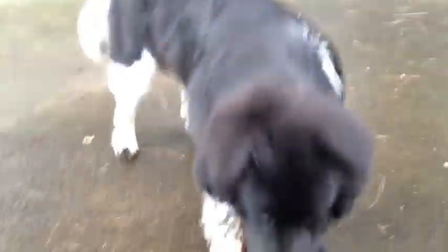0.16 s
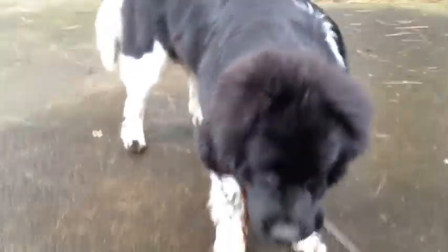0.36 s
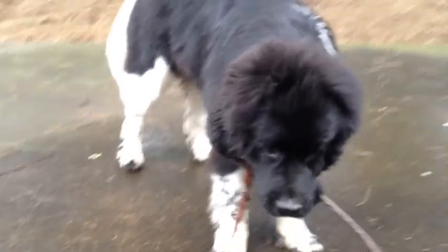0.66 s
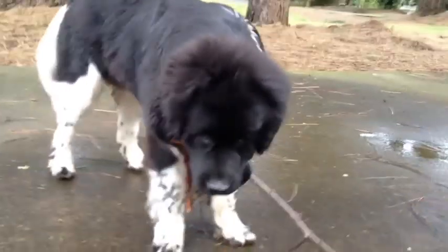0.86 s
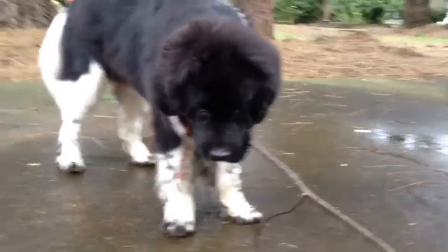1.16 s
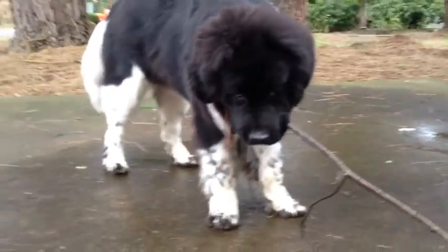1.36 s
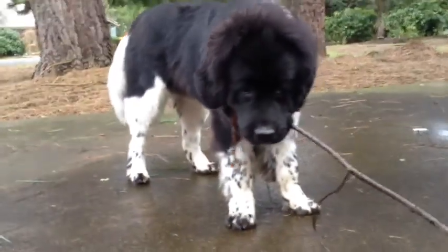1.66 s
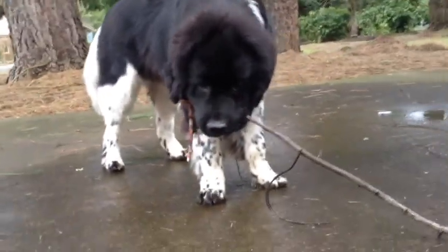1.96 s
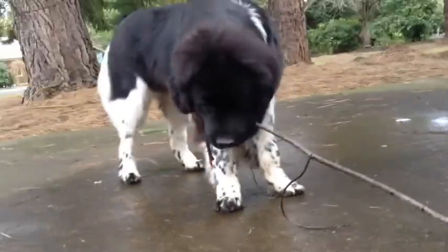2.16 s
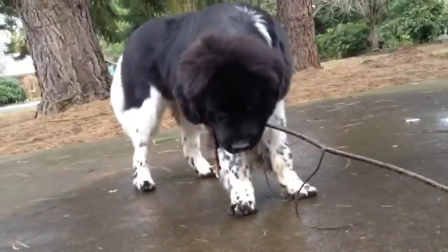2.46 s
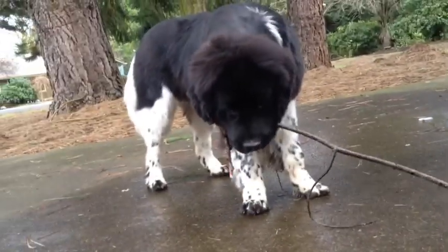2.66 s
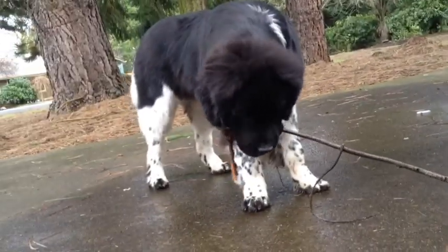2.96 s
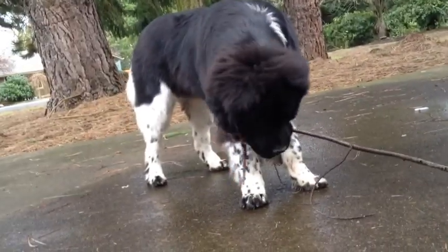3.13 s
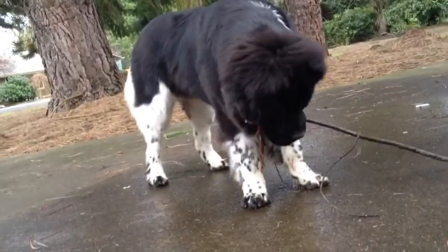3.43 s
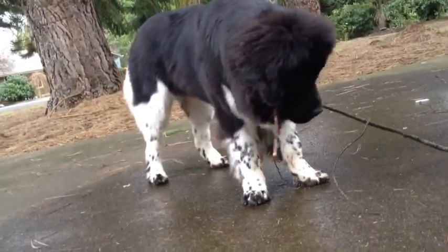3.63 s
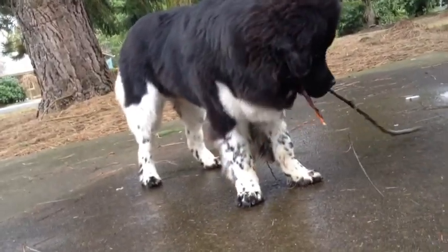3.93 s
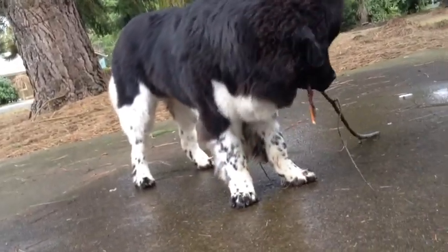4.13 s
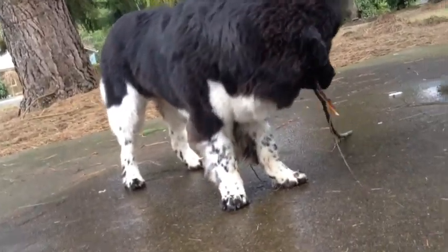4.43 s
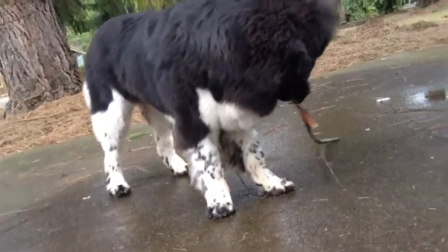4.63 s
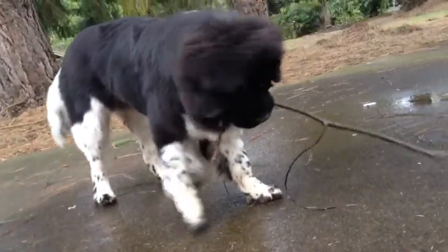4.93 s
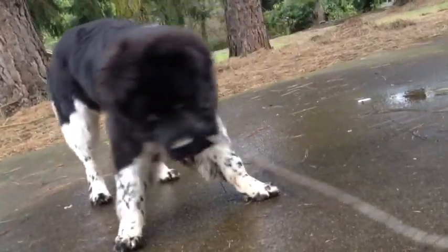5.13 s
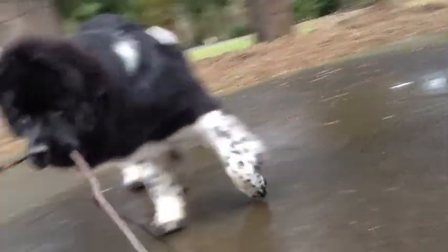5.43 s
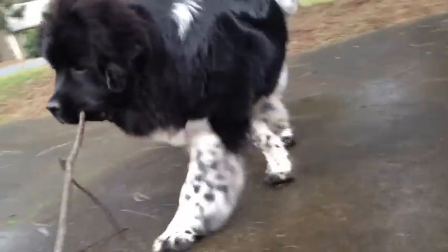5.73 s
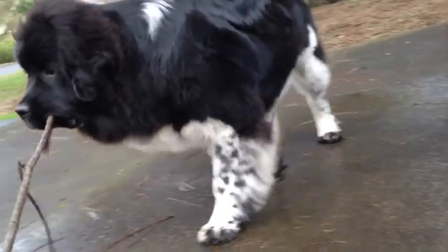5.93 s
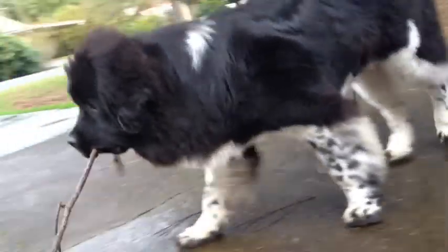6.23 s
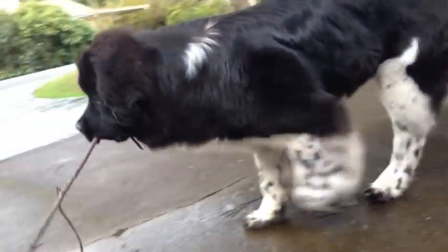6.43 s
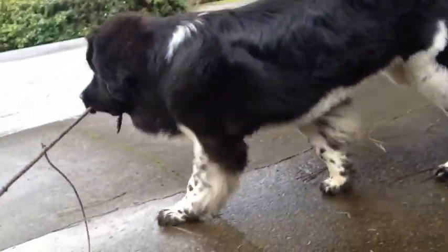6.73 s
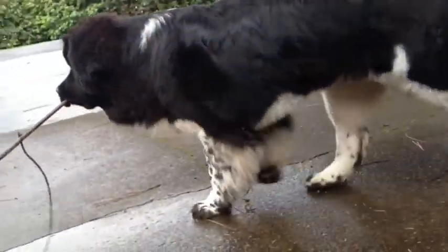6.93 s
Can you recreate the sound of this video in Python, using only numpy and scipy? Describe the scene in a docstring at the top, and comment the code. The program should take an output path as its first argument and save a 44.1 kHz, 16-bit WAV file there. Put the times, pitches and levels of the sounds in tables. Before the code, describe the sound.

One loud snap of a branch, a clattering cluster of knocks and scrapes, then light claw taps over soft traffic rumble and thin birdsong.

```python
"""A long branch, carried over wet garden pavement by a puppy, cracks once, then knocks, clacks and scrapes.
Impulsive or gritty forces drive damped resonances of the wood; claws and twig tips tick as short snaps and rings.
Wet paws scuff and soft rustles swell as shaped friction noise; a near echo and scattering leaves surround them.
A small bird whistles rows of sagging tones among trees; far traffic is filtered noise, with one car slowly
passing and one engine droning as a narrow resonance, over a steady faint hiss."""
import sys
import numpy as np
from scipy import signal
from scipy.fft import rfft, irfft
from scipy.io import wavfile
from scipy.ndimage import uniform_filter1d

SR = 44100
rng = np.random.default_rng(int(sys.argv[2]) if len(sys.argv) > 2 else 0)


def transcribe(u):
    """Save the signal u as a 16-bit wav file named by the first command-line argument.

    u: samples, shape (n,) or (channels, n), limited to [-1, 1]; the rate is SR.
    q: integer samples, one column per channel.
    """
    v = np.clip(np.atleast_2d(u).T, -1, 1)
    q = np.round(v * 32767).astype(np.int16)
    wavfile.write(sys.argv[1], SR, q)


N = 312404
TIME = np.arange(N) / SR


def from_db(db):
    """Level to amplitude: 20 dB is a factor of ten."""
    return 10 ** (np.asarray(db) / 20)


def rms_one(x):
    """Normalisation to unit root-mean-square amplitude."""
    return x / np.sqrt(np.mean(x ** 2) + 1e-20)


def at_level(hit, db):
    """Short-time level: the loudest 2 ms of a hit get the given rms level."""
    loudest_power = uniform_filter1d(hit ** 2, SR // 500).max()
    return from_db(db) * hit / np.sqrt(loudest_power)


def add(track, s, sound):
    """Superposition: mix a sound into the track at time s."""
    start = max(round(s * SR), 0)
    track[start:start + len(sound)] += sound[:max(N - start, 0)]


def cut(x, hz, kind, order=2):
    """Band limiting by a Butterworth low- or high-pass."""
    sos = signal.butter(order, np.clip(hz, 20, .45 * SR), kind, fs=SR, output="sos")
    return signal.sosfilt(sos, x)


def resonance(x, hz, width_hz):
    """Damped mode of vibration: a two-pole resonator with gain 1 at its peak."""
    r = np.exp(-np.pi * width_hz / SR)
    feedforward = np.array([1, 0, -1]) * (1 - r * r) / 2
    feedback = [1, -2 * r * np.cos(2 * np.pi * hz / SR), r * r]
    return signal.lfilter(feedforward, feedback, x + 1e-18)


def dying(t, t60):
    """Exponential decay: an envelope that falls by 60 dB in t60."""
    return np.exp(-np.log(1000) * t / t60)


def drift(per_s):
    """Random modulation, rms 1: straight lines between 4000 random knots, then the last value held."""
    knots = rng.standard_normal(4000)
    return rms_one(np.interp(TIME * per_s, np.arange(len(knots)), knots))


def coloured_noise(spectrum):
    """Spectral shaping: steady noise of a given spectrum, falling 20 dB per octave beyond its ends; rms 1."""
    hz, db = np.transpose(spectrum)
    octave, known = np.log2(np.arange(N // 2 + 1) * SR / N + 1), np.log2(hz)
    beyond = np.abs(octave - np.clip(octave, known[0], known[-1]))
    gain = from_db(np.interp(octave, known, db) - 20 * beyond)
    return rms_one(irfft(rfft(rng.standard_normal(N)) * gain, N))


def contact(t60, grit):
    """Impact excitation: one push, then a dying chatter of tiny slips."""
    t = np.arange(SR // 5) / SR
    force = grit * rng.standard_normal(len(t)) * dying(t, t60)
    force[0] += 1
    return force


# Modes of the branch. Each row: frequency in Hz, width in Hz, gain in dB.
BRANCH_MODES = [(242, 128, -11), (585, 150, -13), (896, 70, 6.5), (1318, 151, -5.5), (2000, 173, -5.5),
                (2660, 127, -5), (4260, 370, -13), (4500, 200, -8.5), (5440, 200, -7.5), (5900, 177, -12),
                (7190, 290, -5), (7820, 540, -7.5), (8460, 360, -5), (9680, 350, -6.5), (11030, 400, -7),
                (11420, 383, -7), (13320, 235, -9.5), (14780, 180, -14)]


def branch(force, drive):
    """Modal superposition: each mode of the wood answers the force in proportion to its drive."""
    rings = 0
    for share, (hz, width_hz, db) in zip(drive, BRANCH_MODES):
        rings = rings + share * from_db(db) * resonance(force, hz, width_hz)
    return rings


# Fractures within the one sharp crack. Each row: time in seconds, relative level in dB.
FRACTURES = [(0.1743, -5), (0.17585, 0)]


def crack(level_db=-15.5, splinter_db=-23, splinter_t60=0.026, grit=0.04):
    """Brittle fracture: fibres give way within two milliseconds, ring the branch and fizz as splinters."""
    force, t = np.zeros(N), TIME[:SR // 20]
    for s, db in FRACTURES:
        splinters = grit * rng.standard_normal(len(t)) * dying(t, splinter_t60)
        fracture = cut(splinters, hz=3490, kind="high")
        fracture[0] += 1
        add(force, s, from_db(db) * fracture)
    signs = (-1.0) ** np.arange(len(BRANCH_MODES))  # neighbouring modes start in opposite phase
    rings = cut(branch(force, signs), hz=218, kind="high")
    fizz = from_db(splinter_db) * cut(force, hz=2500, kind="high")
    return at_level(rings + fizz, level_db)


# Dull knocks on the branch. Each row: start in seconds, level in dB, highest Hz that the blow excites,
# t60 of the contact chatter in seconds.
BLOWS = [(0.599, -46.5, 680, 0.081), (0.716, -50, 700, 0.05), (1.003, -48.5, 557, 0.05),
         (1.2446, -38.5, 480, 0.06), (1.2523, -42, 620, 0.066), (1.2755, -42.5, 850, 0.093),
         (1.396, -48, 890, 0.02), (1.5432, -38, 720, 0.046), (1.5567, -39, 640, 0.046),
         (1.6873, -29, 302, 0.033), (1.6896, -29, 720, 0.049), (1.763, -48, 890, 0.052),
         (2.217, -47.5, 650, 0.11)]


def knocks(position=0.354, level_db=0.0):
    """Mode-shape excitation: soft blows part-way along the branch ring the low modes without a node there."""
    out = np.zeros(N)
    drive = np.sin(np.pi * np.arange(1, len(BRANCH_MODES) + 1) * position)
    for s, db, top_hz, t60 in BLOWS:
        soft = cut(contact(t60, grit=0.097), top_hz, "low", order=4)
        force = cut(soft, hz=156, kind="high", order=3)
        add(out, s, at_level(branch(force, drive), db + level_db))
    return out


# Hollow wooden clacks. Each row: start in seconds, level in dB, pitch in Hz.
HARD_CONTACTS = [(0.7867, -48.5, 1750), (1.3078, -46, 2100), (1.3155, -52, 1900), (1.4492, -50.5, 1720),
                 (1.5435, -48, 2800), (1.557, -40, 2610), (1.6078, -39, 2450), (1.609, -40, 2450),
                 (1.6255, -30, 2400), (1.6888, -52, 2600), (1.695, -38, 3200), (1.7008, -38, 1590),
                 (1.704, -39, 3280), (1.7165, -46, 2600), (1.725, -42, 1650), (1.764, -47, 2990),
                 (2.2097, -54, 2100), (2.358, -53, 1900)]


def clacks(width_hz=520, top_hz=4200, level_db=0.0):
    """Heavily damped resonance: hard, clean contacts ring for a few cycles."""
    out = np.zeros(N)
    for s, db, hz in HARD_CONTACTS:
        ring = resonance(contact(t60=0.017, grit=0.051), hz, width_hz)
        clack = cut(cut(ring, top_hz, "low"), hz=1300, kind="high", order=3)
        add(out, s, at_level(clack, db + level_db))
    return out


# High resonances heard in every sharp contact. Each row: frequency in Hz, width in Hz, gain in dB.
SHARP_RESONANCES = [(4600, 190, 2), (7100, 1000, -2.5), (12460, 2300, 1.5)]


def sharpened(force):
    """Parallel resonance: sharp contacts are heard directly and through shared high resonances."""
    rings = sum(from_db(db) * resonance(force, hz, width_hz) for hz, width_hz, db in SHARP_RESONANCES)
    return cut(force + rings, hz=14000, kind="low")


# a stroke bites quickly and lets go more slowly: shares of its length
STROKE_ATTACK, STROKE_RELEASE = 0.13, 0.6
# average grain rate under a stroke, and the smooth friction relative to a unit grain
GRAINS_PER_S, FRICTION_DB = 2200, -23


def scuff(length, low_hz, high_hz, grain_db):
    """Granular friction: random grit impulses over smooth noise, under one stroke's pressure; rms 1."""
    size = round(length * SR)
    along = np.linspace(0, 1, size)
    ramps = np.minimum(along / STROKE_ATTACK, (1 - along) / STROKE_RELEASE)
    pressure = np.minimum(1, ramps) ** 0.31
    sizes = from_db(grain_db * np.minimum(rng.exponential(1, size), 3)) * rng.choice([-1, 1], size)
    grains = sizes * (rng.random(size) < GRAINS_PER_S / SR)
    friction = from_db(FRICTION_DB) * rng.standard_normal(size)
    stroke = cut(sharpened(grains + friction) * pressure, low_hz, "high")
    softened = cut(stroke, high_hz, "low", order=1)
    return rms_one(cut(softened, 2 * high_hz, "low", order=1))


# a brighter scrape has less bass: its low edge doubles with each step of brightness
SCRAPE_BASS_HZ, BRIGHTNESS_STEP_HZ = 355, 4050
# Gritty scrapes of the branch. Each row: start in seconds, length in seconds, level in dB before the
# overall trim and clumping, brightness in Hz.
DRAGS = [(0.654, 0.11, -68.5, 8000), (0.777, 0.032, -59.5, 4300), (0.981, 0.037, -66.5, 3000),
         (1.25, 0.06, -52, 695), (1.241, 0.07, -58.5, 4200), (1.297, 0.072, -60.5, 6500),
         (1.436, 0.025, -61.5, 6000), (1.495, 0.2, -62, 6500), (1.541, 0.026, -51, 1510),
         (1.6885, 0.021, -41.5, 4020), (1.711, 0.018, -52.5, 3600), (1.735, 0.069, -65, 6000),
         (2.181, 0.092, -65.5, 5800), (2.259, .04, -62, 7000), (2.33, 0.054, -64, 8000),
         (2.385, 0.06, -64.5, 8000)]


def scrapes(clump_db=2.0, level_db=0.5):
    """Stick-slip friction: the branch drags and catches, so its grit comes in clumps."""
    out = np.zeros(N)
    for s, length, db, bright_hz in DRAGS:
        low_hz = SCRAPE_BASS_HZ * 2 ** (bright_hz / BRIGHTNESS_STEP_HZ)
        add(out, s, from_db(db + level_db) * scuff(length, low_hz, bright_hz, grain_db=4.0))
    return out * from_db(clump_db * drift(300))


def tick(hz, width_hz, snap_db, ring_grit=0.075):
    """Impulse response: a tiny bright snap and a short ring, different at each touch."""
    ring = resonance(contact(t60=0.027, grit=ring_grit), hz, width_hz)
    snap = sharpened(cut(contact(t60=0.023, grit=0.39), hz=2200, kind="high", order=1))
    return at_level(ring, 0) + at_level(snap, snap_db)


# grains catch and let go at random: rate, mean level over the drag's table level, spread
CATCHES_PER_S, CATCH_DB, CATCH_SPREAD_DB = 32, 2, 5


def catches(low_hz=3500, high_hz=9000, width_hz=700, snap_db=-6):
    """Random slip events: small ticks scattered along each longer drag, following its level."""
    out = np.zeros(N)
    for start, length, db, _ in DRAGS:
        for when, pitch in rng.random((int(CATCHES_PER_S * length), 2)):
            catch = tick(low_hz * (high_hz / low_hz) ** pitch, width_hz, snap_db)
            catch_db = db + CATCH_DB + CATCH_SPREAD_DB * rng.standard_normal()
            add(out, start + when * length, at_level(catch, catch_db))
    return out


# a tip skips once after each touch: typical delay in seconds, weakening in dB
SKIP_S, SKIP_LOSS_DB = 0.013, 10
# Touches of claws and twig tips on the ground. Each row: start in seconds, level in dB, ring in Hz,
# ring width in Hz, snap relative to the ring in dB.
TOUCHES = [(0.4345, -55, 13000, 1800, -10), (0.445, -54, 11800, 1400, -10), (0.4505, -53, 6800, 1500, -10),
           (0.459, -52, 5400, 1500, -8), (0.6925, -59, 7400, 900, -4), (0.787, -51, 8950, 2000, -8),
           (0.7925, -47, 8000, 2000, -17), (1.248, -53, 4800, 1180, -1), (1.276, -51, 4600, 1200, -5),
           (1.2988, -57, 6200, 1400, -4), (1.3077, -47, 3900, 500, -11), (1.316, -50, 6000, 1400, -3),
           (1.3212, -52, 7800, 1200, -3), (1.3265, -49, 6800, 1200, 0), (1.333, -52, 7000, 1200, -4),
           (1.3388, -53, 6800, 1500, -4), (1.3925, -57, 9000, 1500, -3), (1.398, -51, 12000, 1500, -1),
           (1.4487, -45, 7160, 900, 3), (1.4665, -51, 13000, 1500, 6), (1.5107, -51, 12300, 1400, -7),
           (1.56, -46, 5600, 1200, -8), (1.6266, -41.5, 7640, 1000, -9), (1.6955, -32, 6940, 900, -4),
           (1.6987, -37, 4500, 500, -8), (1.7042, -42, 7500, 1500, -5), (1.7155, -45, 5200, 1300, -8),
           (1.7195, -47, 4400, 900, -8), (1.725, -41, 3900, 1200, -5), (2.1768, -53, 4800, 496, 2),
           (2.1892, -47.5, 12100, 1200, 2), (2.1992, -48, 4900, 1500, -12), (2.2097, -50, 5300, 1800, -11),
           (2.215, -48, 4300, 900, -14), (2.2285, -51.5, 6600, 600, -8), (2.276, -59, 7000, 1500, 1),
           (2.285, -56, 4800, 1400, -1), (2.332, -58, 6900, 800, 1), (2.358, -50.5, 6400, 890, 7),
           (2.3825, -55, 6500, 800, -5), (2.4025, -53, 6880, 700, -6), (2.419, -55, 6800, 700, -3),
           (2.472, -58, 7800, 500, -10), (2.4938, -63, 7800, 500, -10), (2.5454, -51.5, 4600, 300, 1),
           (2.5556, -46, 4650, 220, 2.5), (3.13, -54, 6800, 1500, -1), (3.2113, -46, 4670, 380, -6),
           (3.2267, -56, 4730, 380, -10), (3.489, -52, 12100, 1500, 2), (3.5741, -56, 7000, 900, -7),
           (3.7038, -57, 8000, 1000, 3), (4.1523, -55, 7870, 1200, -2), (4.1674, -51.5, 4000, 700, 6),
           (5.1037, -46, 7650, 1100, -1), (5.1082, -51, 3660, 600, 2), (5.405, -58, 8500, 1500, -2),
           (5.4528, -53.5, 7600, 1200, -4), (5.7256, -53.5, 10500, 1600, -3), (5.903, -59, 6000, 1400, 2),
           (6.402, -59, 12000, 1800, -2), (6.429, -56, 9500, 1800, 0), (6.5249, -57, 11200, 1400, 0),
           (6.556, -63, 9000, 1400, -6), (6.588, -60, 11500, 1800, -2), (6.72, -50, 4870, 1600, 0),
           (6.9408, -48, 6200, 1100, -7), (6.948, -55, 14000, 1800, -8)]


def ticks(level_db=0.0):
    """Repeated impact: each tip touches, then skips once, later and weaker."""
    out = np.zeros(N)
    for s, db, *colour in TOUCHES:
        add(out, s, at_level(tick(*colour), db + level_db))
        skip = at_level(tick(*colour), db + level_db - SKIP_LOSS_DB)
        add(out, s + SKIP_S * rng.uniform(0.55, 1.4), skip)
    return out


# length in seconds and band edges shared by all paw brushes
PAW_S, PAW_LOW_HZ, PAW_HIGH_HZ = 0.082, 4800, 14900
# Wet paws brush the pavement. Each row: start in seconds, level in dB before clumping.
PAW_BRUSHES = [(0.411, -63.5), (2.44, -74), (4.12, -74), (5.17, -72), (5.26, -70.5), (5.39, -66.5),
               (6.389, -68), (6.566, -68.5), (6.892, -67.5)]


def paws(clump_db=2.0, level_db=0.0):
    """Sliding friction: each wet pad makes a short, bright brush of one length and colour."""
    out = np.zeros(N)
    for s, db in PAW_BRUSHES:
        add(out, s, from_db(db + level_db) * scuff(PAW_S, PAW_LOW_HZ, PAW_HIGH_HZ, grain_db=3.0))
    return out * from_db(clump_db * drift(300))


# Soft rustles as the puppy turns. Each row: start in seconds, length in seconds, level in dB, centre in Hz.
SOFT_RUBS = [(4.662, 0.21, -75, 3000), (5.168, .34, -73.5, 2300), (5.658, 0.16, -71, 2580),
             (5.856, 0.18, -72, 2500), (6.265, .15, -71, 2000)]


def rustles(width_hz=900, level_db=0.0):
    """Band-limited friction: a smooth swell of noise in one broad band."""
    out, rub = np.zeros(N), rng.standard_normal(N)
    for s, length, db, hz in SOFT_RUBS:
        start, size = round(s * SR), round(length * SR)
        swell = rub[start:start + size] * np.sqrt(np.hanning(size))
        add(out, s, from_db(db + level_db) * rms_one(resonance(swell, hz, width_hz)))
    return out


# Colour of the sound scattered by leaves. Each row: frequency in Hz, relative density in dB per Hz.
LEAF_SPECTRUM = [(2000, 1), (3400, -6.5), (5000, -1.5), (7500, 4), (9500, 2), (12000, -2), (15000, -8)]


def garden(x, wet_db=-20.0, t60=0.267, delay=0.016, echo_db=-27, echo_t60=0.072):
    """Reflection and scattering: a near surface smears a dull echo; leaves diffuse treble into a dying hiss."""
    t = np.arange(SR) / SR
    smear = rng.standard_normal(SR) * dying(t, echo_t60) * (1 - dying(t, t60=0.03))
    near = cut(smear, hz=1007, kind="low", order=1)
    echo = from_db(echo_db) * signal.fftconvolve(x, rms_one(near) / np.sqrt(SR))[:N]
    fade = dying(t, t60) ** 2  # decay of power
    treble_power = cut(x, hz=3503, kind="high") ** 2
    scattered_power = signal.fftconvolve(treble_power, fade / fade.sum())[:N]
    hiss = from_db(wet_db) * np.sqrt(np.abs(scattered_power)) * coloured_noise(LEAF_SPECTRUM)
    out = x.copy()
    add(out, delay, echo + hiss)
    return out


# a phrase is a quick row of tiny notes, each sagging in pitch, and it fades towards its end
NOTE_S, NOTE_SAG_HZ = 0.013, 200  # the note length is rounded to fit the phrase
PHRASE_FADE_DB = 2.5
# Bird phrases. Each row: start in seconds, length in seconds, level in dB before the overall trim,
# first pitch in Hz, last pitch in Hz, scale of note scatter and flutter in Hz.
WHISTLES = [(0.57, 0.16, -75, 8250, 8200, 30), (0.774, 0.076, -64, 7930, 7800, 30),
            (0.909, 0.13, -68.5, 8180, 7900, 30), (3.583, 0.52, -75.5, 8600, 8360, 260),
            (4.868, 0.035, -72, 8100, 8150, 100), (4.905, 0.08, -67, 8170, 8280, 100),
            (4.984, 0.045, -63, 8140, 7950, 80), (5.04, 0.083, -68, 8280, 8060, 160),
            (5.113, 0.06, -67, 8030, 8060, 120), (5.201, 0.065, -65.5, 8020, 7900, 140),
            (5.275, 0.085, -73, 8050, 7880, 130), (5.443, 0.11, -67.5, 8200, 8280, 140),
            (5.58, 0.23, -73, 8250, 8250, 190), (5.813, 0.14, -71.5, 8230, 8380, 180),
            (6.768, .1, -72.5, 8040, 8140, 80)]


def bird(flutter=1.1, note_spread_db=2.5, level_db=-5.0):
    """Frequency modulation: thin, quick whistles vary in pitch and strength; scattered notes flutter more."""
    out, waver = np.zeros(N), flutter * drift(700)
    for start, length, db, first_hz, last_hz, scatter_hz in WHISTLES:
        span = slice(round(start * SR), round((start + length) * SR))
        along = np.linspace(0, 1, len(TIME[span]))
        note, in_note = np.divmod(along * max(round(length / NOTE_S), 1), 1)
        pitch, strength = rng.standard_normal((500, 2))[note.astype(int)].T
        glide_hz = first_hz + (last_hz - first_hz) * along
        hz = glide_hz + scatter_hz * (.5 * pitch + waver[span]) + NOTE_SAG_HZ * (.5 - in_note)
        note_db = note_spread_db * strength - PHRASE_FADE_DB * along
        effort = np.sqrt(np.sin(np.pi * in_note)) * from_db(note_db)
        phase = 2 * np.pi * np.cumsum(hz) / SR
        add(out, start, from_db(db + level_db) * rms_one(effort * np.sin(phase)))
    return out


def trees(x, wet_db=-3, t60=0.3):
    """Reverberation: a far call arrives with many reflections off the trunks."""
    decay = rng.standard_normal(SR) * dying(np.arange(SR) / SR, t60)
    response = rms_one(decay) / np.sqrt(SR)
    return x + from_db(wet_db) * signal.fftconvolve(x, response)[:N]


# mean levels of far traffic: engine hum and steady tyre noise
HUM_DB, TYRES_DB = -56, -62
# one car goes slowly by: tyre level at its nearest, time of that, seconds to fall 3 dB
CAR_DB, CAR_NEAREST_S, CAR_PASS_S = -60, 3.46, 2.05
# Spectra of engine hum, tyre noise and the steady faint background hiss. Each row: frequency in Hz,
# relative density in dB per Hz.
HUM_SPECTRUM = [(30, -30), (48, -33), (62, -14.5), (85, -16), (115, -1.5), (185, 0), (270, -5), (380, -10),
                (600, -29), (1200, -54)]
TYRE_SPECTRUM = [(250, -14.5), (450, 2), (650, 0), (1000, -1.5), (1500, -6.5), (2200, -12), (3300, -18.5),
                 (6000, -31.5)]
HISS_SPECTRUM = [(2000, -3), (4100, 3.5), (4600, 4), (5200, 1), (8000, 1), (10000, -4.5), (13000, 0.5),
                 (15500, -1)]


def background(hiss_db=-69.5, hum_wander_db=1.24, tyre_wander_db=0.42):
    """Distance law: a passing car falls off with its distance, amid far hum, tyre rush and faint hiss."""
    hum = from_db(HUM_DB + hum_wander_db * drift(10.0)) * coloured_noise(HUM_SPECTRUM)
    car = from_db(CAR_DB) / np.hypot(1, (TIME - CAR_NEAREST_S) / CAR_PASS_S)
    tyre_level = np.hypot(from_db(TYRES_DB), car)  # independent noises add in power
    tyres = tyre_level * from_db(tyre_wander_db * drift(11.0)) * coloured_noise(TYRE_SPECTRUM)
    return hum + tyres + from_db(hiss_db) * coloured_noise(HISS_SPECTRUM)


DRONE_HZ, DRONE_WIDTH_HZ = 190.9, 14  # the width is that of each of two equal resonances in series
# Swell of a far engine at one pitch. Each row: time in seconds, level in dB.
DRONE_SWELL = [(0, -86), (2.0, -60.5), (2.35, -58.5), (2.9, -63), (3.3, -72), (7.08, -64)]


def drone():
    """Narrow-band noise: the firing note of one far engine wavers as it swells and sinks."""
    once = resonance(rng.standard_normal(N), DRONE_HZ, DRONE_WIDTH_HZ)
    note = resonance(once, DRONE_HZ, DRONE_WIDTH_HZ)
    evened = note / np.sqrt(uniform_filter1d(note ** 2, SR // 4) + 1e-20)  # level evened over 0.25 s
    return from_db(np.interp(TIME, *np.transpose(DRONE_SWELL))) * evened


def scene():
    """Superposition of sources: the puppy and branch are close, bird and traffic are far."""
    wood = crack() + knocks() + clacks() + scrapes() + catches()
    puppy = wood + ticks() + paws() + rustles()
    return (garden(puppy) + trees(bird()) + background() + drone())[None]


CUTOFF_HZ = 15400


def record(dry):
    """Band limitation: an elliptic low-pass cuts the top of the band steeply."""
    return signal.sosfilt(signal.ellip(10, .1, 80, CUTOFF_HZ, fs=SR, output="sos"), dry)


dry = scene()
out = record(dry)
transcribe(out)
```